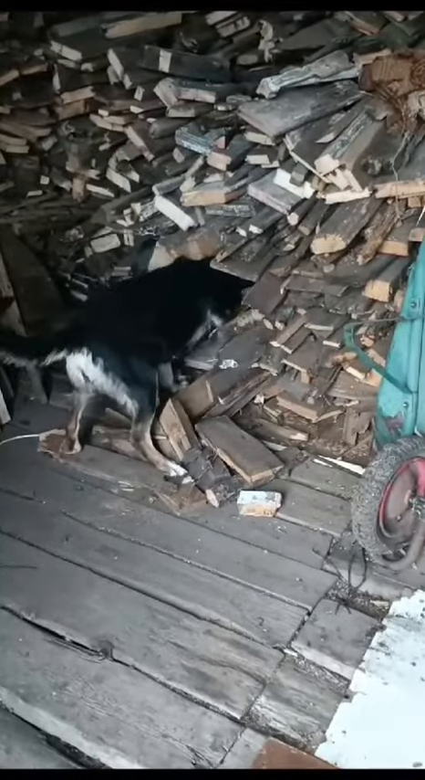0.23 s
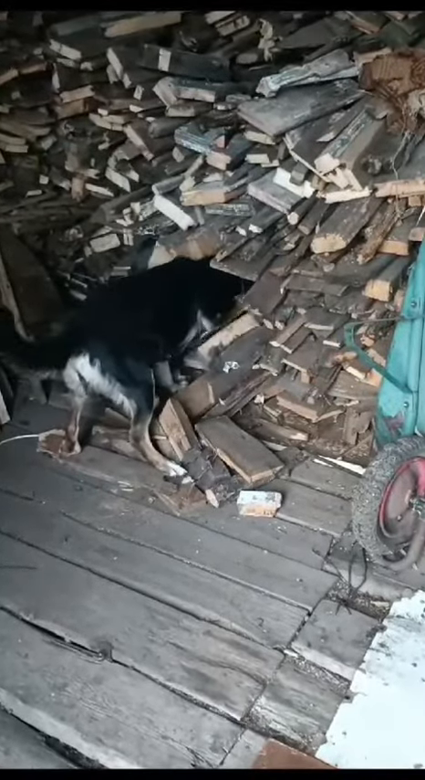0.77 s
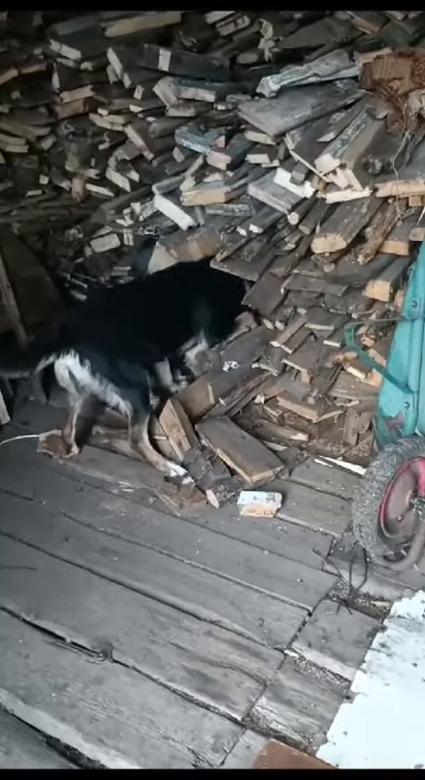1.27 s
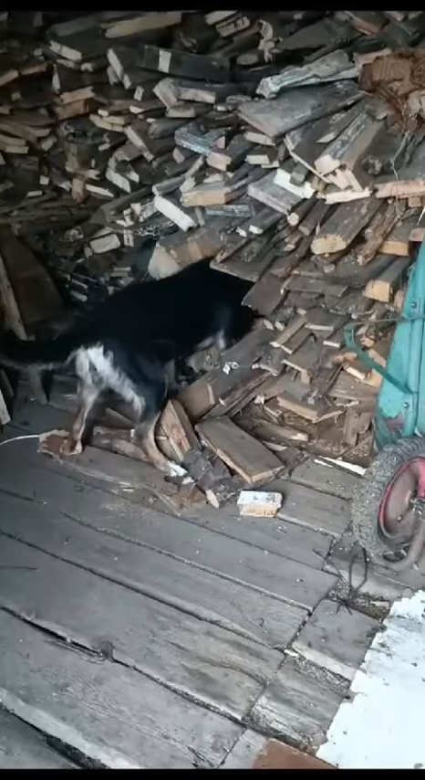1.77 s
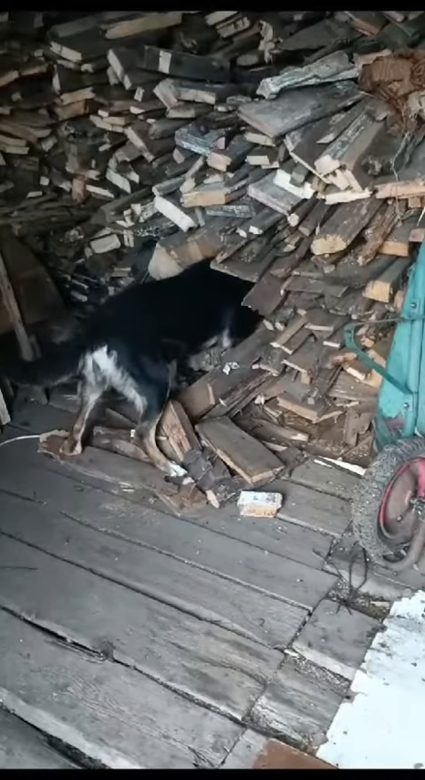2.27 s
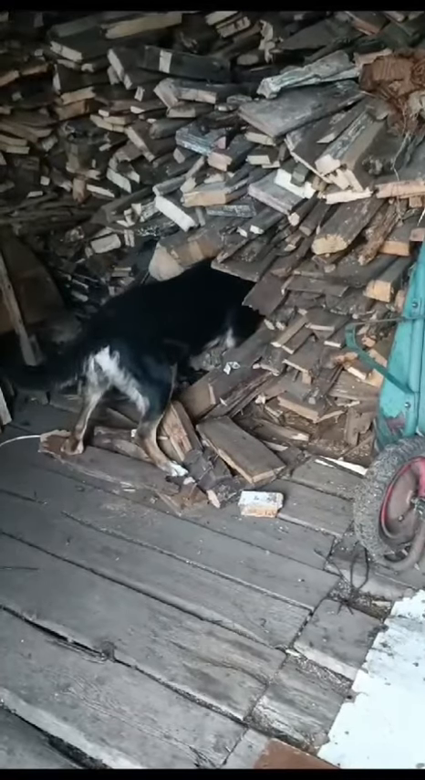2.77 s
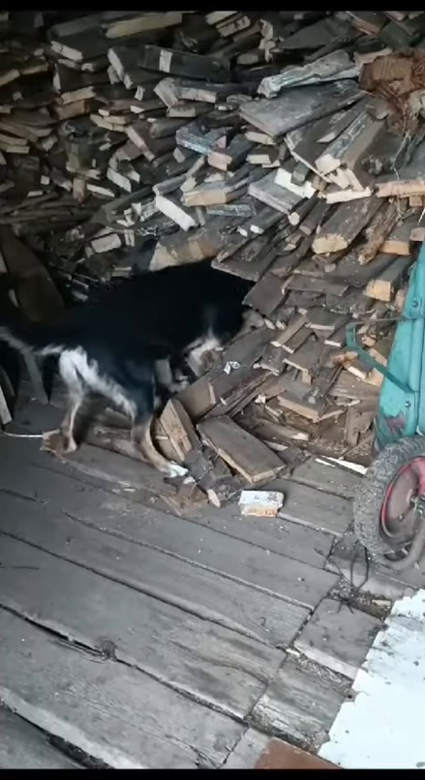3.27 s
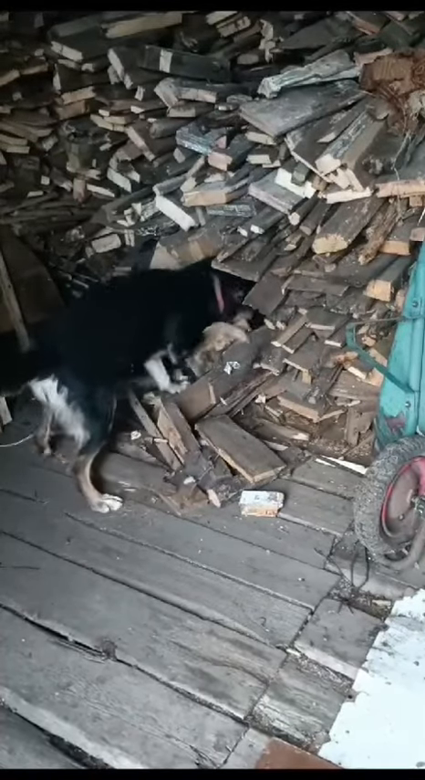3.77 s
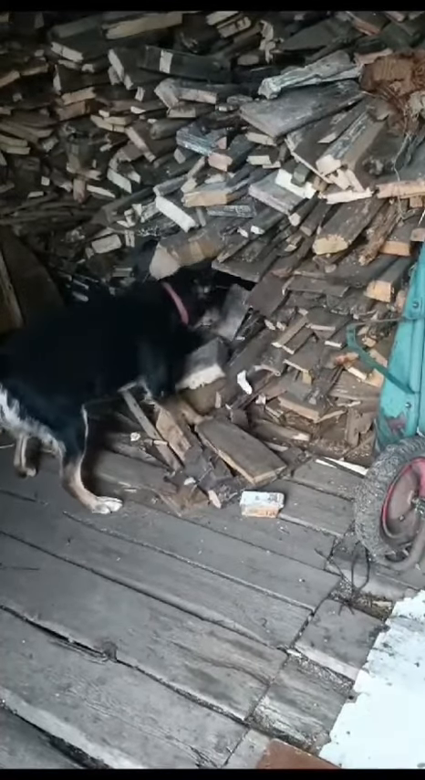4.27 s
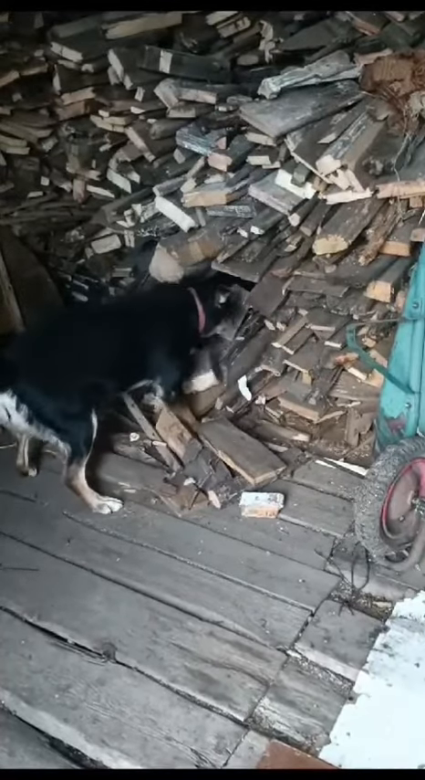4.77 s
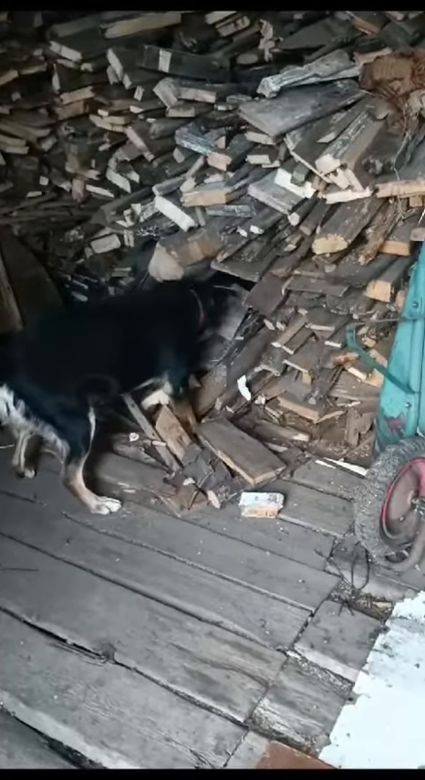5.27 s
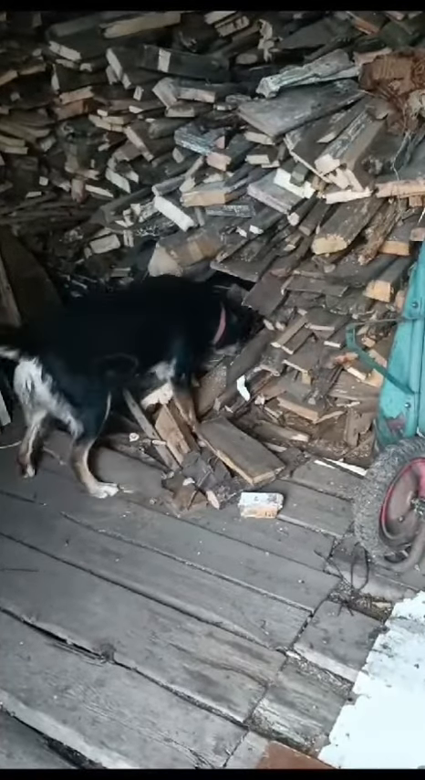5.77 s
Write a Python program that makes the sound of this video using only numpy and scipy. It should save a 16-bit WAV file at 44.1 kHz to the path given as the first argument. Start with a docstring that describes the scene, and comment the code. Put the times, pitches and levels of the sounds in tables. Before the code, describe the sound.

Dry wooden knocks, sharp claw ticks and short scrapes come in uneven bursts as a dog burrows into stacked firewood, heaviest near the end.

```python
"""Dog digging in a woodpile

A dog digs into a pile of split firewood in a plank shed, a few steps from a phone.
Claws and bark edges tick as short noise cracks; logs knock on logs and the floor boards thud as
dying sines. Wood drags on wood as grainy noise in bursts, and soft creaks are swelling sines.
The shed answers with sparse decaying echoes over a faint outdoor hush of patchy noise."""
import sys
import numpy as np
from scipy import signal
from scipy.fft import rfft, irfft
from scipy.io import wavfile
from scipy.ndimage import uniform_filter1d

SR = 44100
rng = np.random.default_rng(int(sys.argv[2]) if len(sys.argv) > 2 else 0)


def materialize(psi):
    """Save the field psi as 16-bit PCM at rate SR to the path in sys.argv[1].

    A 1-D psi becomes a single channel; in a 2-D psi each row is a channel.
    """
    bounded = np.clip(np.atleast_2d(psi).T, -1, 1)
    quanta = np.round(bounded * 32767).astype(np.int16)
    wavfile.write(sys.argv[1], SR, quanta)


N = 265482


def gain_of(db):
    """Amplitude factor for a level in dB."""
    return 10 ** (np.asarray(db) / 20)


def evened(x):
    """Scale a sound to an RMS of one."""
    return x / np.sqrt(np.mean(x ** 2) + 1e-20)


def read(points, hz):
    """Read a curve between its points on a logarithmic frequency axis."""
    f, value = np.transpose(points)
    return np.interp(np.log(hz + 1), np.log(f + 1), value)


def add(mix, start_s, sound):
    """Lay a sound into the mix, cutting off what runs past the end."""
    part = mix[:, max(round(start_s * SR), 0):][:, :sound.shape[1]]
    part += sound[:, :part.shape[1]]


def panned(db):
    """Left and right gains that differ by the given dB."""
    return gain_of(np.array([db, -db]) / 2)


# How alike the sound is at the two microphone ports. Each row: frequency in Hz, likeness from -1 to 1.
LIKENESS = [(60, 0.86), (180, 0.96), (550, 0.56), (1650, -0.16), (5000, 0.25), (15000, -0.34)]


def alike(pair, likeness):
    """Blend the left spectrum into the right one by the given likeness, keeping its power."""
    left, right = pair
    return np.array([left, likeness * left + np.sqrt(1 - likeness ** 2) * right])


def coloured(pair, spectrum):
    """Two unrelated noises become a left-right pair, alike in the bass, with the given spectrum."""
    size = pair.shape[1]
    hz = np.fft.rfftfreq(size, 1 / SR)
    likeness = np.clip(read(LIKENESS, hz), -1, 1)
    return evened(irfft(gain_of(read(spectrum, hz)) * alike(rfft(pair), likeness), size))


DULL_HZ, DULL_DB_PER_OCTAVE = 2670, -13  # wood hardly rings above this


def rung(modes, hz, t60, rise_s, spread):
    """Dying sines of one piece of wood; no two pieces share quite the same ratios."""
    t = np.arange(round(.3 * SR)) / SR
    detune = 1 + spread * rng.uniform(-1.13, 1, len(modes)) * [m[0] != 1 for m in modes]
    ring = np.zeros(len(t))
    for (ratio, db, t60_factor), shift in zip(modes, detune):
        dulling_db = DULL_DB_PER_OCTAVE * max(np.log2(hz * ratio / DULL_HZ), 0)
        envelope = gain_of(db + dulling_db - 60 * t / (t60 * t60_factor))
        ring += envelope * np.sin(2 * np.pi * hz * ratio * shift * t)
    ring = ring * (1 - np.exp(-t / rise_s))
    return ring / abs(ring).max()


# Claws and bark edges catching in the pile, a few steps off. Each row: start in seconds, level in dB
# before the layer gain, dull body in dB and top in dB (both relative to the bright part), centre in Hz.
TICKS = [(0.0214, -15.5, 6, -32, 4240), (0.051, -23.5, -17, -20, 6300), (0.1036, -15, -11, -20, 6300),
         (0.2311, -33.5, -3, -11, 6780), (0.498, -36.5, -5.5, -16, 6200), (0.5515, -35.5, -21, -8, 5700),
         (0.5921, -20, -14, -17.5, 6500), (0.6056, -23.5, -16, -17, 6440), (0.6535, -30.5, -8, -12, 5760),
         (0.7527, -37, -3.5, -19, 6500), (0.7729, -25, -6.5, -17, 5970), (0.8126, -24.5, -10, -10, 4550),
         (0.984, -35, -10, -28, 4100), (1.2101, -39.5, -4.5, -11, 4940), (1.2415, -26.5, -11, -15, 5630),
         (1.294, -37, -12, -22, 6330), (1.3985, -38, -17, -8, 5460), (1.6597, -28.5, -14.5, -7, 4200),
         (1.7418, -19.5, -14, -18.5, 6570), (2.3773, -44.5, -9, -28, 6500), (2.453, -51, -1, -16, 6170),
         (2.5247, -50, -11, -9, 5500), (3.1457, -33, -10, -13, 6500), (3.1893, -33, -7.5, -15, 6330),
         (3.3484, -29.5, 0, -17, 6170), (3.5279, -24.5, -5, -13, 6960), (3.5793, -19, -7, -12, 5070),
         (3.591, -16.5, 1.5, -6.5, 6760), (3.6534, -13, -37, -12, 6460), (3.705, -22.5, -5.5, -10, 4850),
         (3.718, -28, -10, -18, 5000), (3.7755, -31.5, -6, -9, 6800), (3.8636, -33, -17, -9, 6300),
         (3.892, -30, 1, -11, 6150), (4.1083, -20, -15, -17, 6140), (4.1218, -28, 0, 0, 6450),
         (4.252, -16.5, -8, -25, 5600), (4.261, -22, 1, -27, 6100), (4.3263, -19, -27, -29, 6700),
         (4.4098, -29.5, -17, -13, 5000), (4.4306, -22.5, -1.5, -16, 6330), (4.5067, -29, -23, -7, 6800),
         (4.574, -32.5, -31, -13, 6200), (4.662, -35, -17, -13, 6120), (4.6932, -24, -12, -7.5, 6700),
         (4.7538, -26.5, -22, -7, 4760), (4.7733, -18, -13, -7, 5960), (4.8626, -27.5, -9, -22, 6400),
         (4.9014, -30.5, 8.5, -24, 6600), (4.959, -23.5, 16.5, -33, 4800), (5.0338, -35, 6, -35, 5900),
         (5.3823, -48, -25, -16, 6580), (5.4945, -16, -3, -18, 4800), (5.591, -32.5, -1.5, -11, 4900),
         (5.623, -32, -15, -26, 6100), (5.6519, -18.5, -36, -16, 4140), (5.655, -8.5, -35, -13, 7000),
         (5.7965, -28.5, -7, -18, 6500), (5.9208, -25.5, -4, -16, 4860)]
# Colour of scraping wood. Each row: frequency in Hz, relative density in dB per Hz.
RASP = [(1500, -13.5), (2600, -10), (3850, -8), (4460, -3.5), (5530, -8.5), (6350, -1.5), (7230, -5.5),
        (7930, -27), (9320, -16), (14600, -16.5), (15500, -24.5), (16400, -53)]
# Colour of the logs' dull body. Each row: frequency in Hz, relative density in dB per Hz.
BODY = [(250, -50), (420, -10.5), (471, -21.5), (574, 0.5), (634, -8), (766, -1.5), (1000, -5.5),
        (1570, -3), (1700, -0.5), (2600, -4), (3300, -8), (6600, -120)]
SPLIT_HZ = 7900  # border between a tick's bright part and its top
TICK_T60_S = 0.015


def ticks():
    """A few milliseconds of crack, lifted around its own centre; top and dull parts in their own share."""
    size = 2048
    rasp, dull = (coloured(rng.standard_normal((2, N + size)), s) for s in (RASP, BODY))
    t, hz, out = np.arange(size) / SR, np.fft.rfftfreq(size, 1 / SR), np.zeros((2, N))
    envelope = gain_of(-60 * t / TICK_T60_S) * (1 - np.exp(-t / 0.00055))
    for start_s, db, body_db, top_db, centre_hz in TICKS:
        first = round(start_s * SR)
        span = slice(first, first + size)
        spectrum = rfft(rasp[:, span])
        lift_db = 5 * np.exp(-(np.log((hz + 1) / centre_hz) / 0.14) ** 2)
        bright = evened(irfft(spectrum * (hz <= SPLIT_HZ) * gain_of(lift_db)))
        top = evened(irfft(spectrum * (hz > SPLIT_HZ)))
        crack = bright + gain_of(top_db) * top + gain_of(body_db) * dull[:, span]
        crack = crack * envelope
        # a strong body makes the whole tick louder
        add(out, start_s, gain_of(db) * crack * np.hypot(1, gain_of(body_db)) / abs(crack).max())
    return out


# Log on log in the pile. Each row: start in seconds, level of the big log in dB before the layer gain,
# pitch of the big log in Hz, pitch of the small log in Hz, small log relative to the big one in dB,
# base t60 in seconds.
KNOCKS = [(0.0222, -19.5, 565, 1593, 6, 0.03), (0.07, -31, 790, 1780, 2.5, .057),
          (0.241, -33.5, 655, 2040, -10, 0.08), (0.299, -34.5, 693, 1520, -7, 0.027),
          (0.392, -44, 800, 1560, 4.5, 0.058), (0.497, -46.5, 810, 1460, 4.5, 0.054),
          (0.59, -54, 895, 2540, 12, .05), (0.719, -49, 1045, 2090, 9, .064),
          (0.774, -37, 716, 1500, 7, .045), (1.089, -36.5, 710, 1850, -11, 0.03),
          (1.204, -48, 513, 1580, 0, 0.13), (1.381, -37.5, 510, 1870, -21, 0.028),
          (1.741, -54.5, 710, 2080, 16.5, 0.074), (2.164, -65, 580, 1950, 8, .05),
          (2.366, -62, 836, 2180, 15, 0.018), (2.449, -59, 610, 1760, 13, 0.02),
          (3.188, -39.5, 660, 2450, -8, 0.14), (3.332, -25.5, 550, 1420, -32, 0.039),
          (3.477, -52, 698, 1900, 16, .04), (3.495, -51, 680, 1920, 17, 0.049),
          (3.519, -32.5, 1050, 2046, -6, 0.23), (3.589, -33.5, 674, 1636, 9, 0.048),
          (3.609, -18.5, 710, 1450, -7, 0.024), (3.702, -33.5, 715, 2105, -6, 0.15),
          (3.862, -33.5, 527, 1880, -10, 0.035), (3.892, -51, 615, 1710, 9, 0.028),
          (3.996, -36.5, 990, 1200, -3, .056), (4.191, -27, 597, 1550, 3.5, .038),
          (4.26, -27, 1060, 1830, 4, .043), (4.278, -17, 723, 1280, -2.5, 0.028),
          (4.288, -26, 576, 1770, 7, 0.018), (4.299, -23.5, 1120, 1564, 8, 0.042),
          (4.355, -28.5, 780, 1600, -6, 0.049), (4.367, -24.5, 853, 2310, 2.5, 0.038),
          (4.431, -31, 453, 1870, 2, 0.074), (4.524, -50, 660, 1520, 14.5, .065),
          (4.643, -40, 680, 1260, -1, 0.028), (4.661, -26.5, 1005, 1520, 1, 0.022),
          (4.866, -32, 550, 1670, -5, .05), (4.896, -19.5, 530, 2380, -14, 0.059),
          (4.9595, -4, 605, 2150, -13, 0.025), (4.968, -11, 516, 1860, -9, 0.093),
          (5.0335, -11.5, 558, 2125, -10.5, 0.051), (5.044, -14, 600, 1930, -11, 0.015),
          (5.195, -42, 613, 1920, 10, 0.11), (5.498, -14, 542, 1200, -24, 0.023),
          (5.512, -17, 710, 2680, -5.5, 0.018), (5.658, -29.5, 1110, 2226, 13, 0.018),
          (5.776, -30, 685, 1270, -35, 0.096), (5.83, -19.5, 697, 1380, -9, 0.028),
          (5.918, -42, 696, 1950, 6, .05), (5.951, -22.5, 584, 1400, -7.5, 0.028),
          (5.981, -16.5, 1430, 2240, 0.5, 0.035), (5.991, -23, 1150, 2394, 2, .04)]
# Modes of a log. Each row: factor on pitch, level in dB, factor on t60.
LOG = [(.77, -12, 0.99), (1, 2.5, 0.63), (1.29, -11.5, 0.97), (1.74, -6.5, 0.56), (2.4, -9, 0.57)]
KNOCK_PAN_DB = -1  # left-right


def knocks():
    """Each blow rings both logs that meet."""
    out = np.zeros((2, N))
    for start_s, db, big_hz, small_hz, small_db, t60 in KNOCKS:
        big, small = (rung(LOG, hz, t60, rise_s=0.00076, spread=.08) for hz in (big_hz, small_hz))
        both = big + gain_of(small_db) * small
        add(out, start_s, gain_of(db) * np.outer(panned(KNOCK_PAN_DB), both))
    return out


# Weight landing on the shed's floor boards. Each row: start in seconds, peak in dB before the layer
# gain, pitch in Hz.
THUDS = [(0.008, -28.5, 181.5), (0.024, -23.5, 274), (0.215, -34, 258), (0.514, -42.5, 151),
         (0.656, -34.5, 146), (0.738, -38.5, 170), (1.078, -29.5, 158), (1.209, -33, 131),
         (1.315, -36.5, 346), (1.378, -40, 134), (3.121, -40.5, 244), (3.195, -39, 243),
         (3.272, -34.5, 176), (3.336, -21, 149.5), (3.601, -18.5, 270), (3.657, -24.5, 250),
         (3.862, -45, 446), (3.929, -36.5, 141.4), (4.123, -31, 147), (4.181, -22, 280),
         (4.239, -28.5, 138), (4.282, -20.5, 285), (4.355, -23, 259), (4.424, -31, 171),
         (4.542, -32.5, 323.6), (4.687, -33.5, 173), (4.766, -29.5, 255.6), (4.893, -19, 159),
         (4.962, -14.5, 176), (5.036, -21, 281), (5.491, -20, 312.3), (5.665, -24, 136),
         (5.684, -19.5, 148), (5.775, -16.5, 254), (5.831, -21, 290), (5.954, -16.5, 163)]
# Modes of the floor boards. Each row: factor on pitch, level in dB, factor on t60.
BOARDS = [(.72, -12, 1), (1, 2, 0.75), (1.55, -5.5, 0.8), (2.1, -6.5, 0.67)]


def thuds():
    """Soft, heavy contacts: the boards swing up slowly."""
    out = np.zeros((2, N))
    for start_s, db, hz in THUDS:
        ring = rung(BOARDS, hz, t60=0.065, rise_s=0.0091, spread=0.098)
        add(out, start_s, gain_of(db) * np.outer([1, 1], ring))
    return out


# Colour of the boards under the dragging wood. Each row: frequency in Hz, relative density in dB per Hz.
RUMBLE = [(15, -55), (25, -57), (48, 0.5), (86, -10.5), (134, 0), (183, -1), (215, -9), (259, 0), (296, -6),
          (480, -21.5), (620, -50), (1060, -120)]


def drag(grain_s=0.0031, smooth=0.44, ringing=0.57):
    """Each slip is a short puff of rasp; the logs chatter and the boards rumble under it."""
    puffs = signal.lfilter([1], [1, -np.exp(-1 / (grain_s * SR))], slips(per_s=980, uneven_db=3.5))
    grains = smooth + evened(puffs)
    rasp, body, rumble = (coloured(grains * rng.standard_normal((2, N)), c) for c in (RASP, BODY, RUMBLE))
    body = evened((1 - ringing) * body + ringing * chatter())
    return sum(level * layer for level, layer in zip(strokes(), (rasp, body, rumble)))


# Strokes of wood dragging on wood. Each row: start in seconds, hold in seconds, rasp in dB, body in dB,
# rumble in dB.
STROKES = [(0.0, 0.036, -34, -39, -40.5), (0.071, 0.14, -48, -50, -53.5), (0.314, 0.019, -54, -56, -53.5),
           (0.387, .04, -61.5, -61, -67), (0.523, 0.032, -62, -62.5, -66), (0.66, 0.058, -52.5, -48, -55),
           (0.758, 0.031, -45, -48, -49.5), (0.854, 0.05, -55.5, -61.5, -75),
           (0.986, 0.11, -58, -61.5, -61), (1.246, 0.056, -47, -52.5, -58.5),
           (1.322, 0.068, -59.5, -57, -49.5), (1.58, 0.27, -65.5, -72, -74), (2.458, 0.06, -65.5, -75, -67),
           (3.046, .04, -63, -72, -75), (3.108, 0.056, -57.5, -62, -60.5), (3.196, 0.045, -52, -53.5, -61),
           (3.324, 0.027, -42, -46, -48.5), (3.405, 0.056, -53, -55.5, -58.5), (3.485, 0.03, -44, -55, -73),
           (3.578, 0.094, -43.5, -43.5, -45), (3.704, 0.016, -38.5, -41, -44.5),
           (3.784, 0.018, -46.5, -63, -72), (3.896, 0.044, -53.5, -48, -54.5),
           (4.007, 0.015, -51, -52, -63), (4.144, 0.12, -34.5, -40.5, -43),
           (4.225, 0.084, -33.5, -34.5, -41), (4.351, 0.038, -60, -40, -43),
           (4.434, 0.0096, -39.5, -44, -52), (4.496, .05, -52.5, -58, -61),
           (4.672, 0.15, -49.5, -50.5, -47.5), (4.879, 0.044, -37, -45, -44.5),
           (4.952, 0.09, -39, -36.5, -40), (5.089, 0.039, -48.5, -64, -55),
           (5.202, 0.0086, -44.5, -47.5, -51), (5.29, 0.067, -69, -67, -62.5),
           (5.396, 0.076, -60.5, -65.5, -63), (5.636, 0.077, -44, -47, -51), (5.821, 0.0083, -36, -41, -45),
           (5.939, .02, -45, -47.5, -37.5)]
# rasp, body, rumble: heavier wood moves more slowly
RISE_DB_PER_S, FALL_DB_PER_S = (440, 306, 203), (281, 210, 136)
SETTLING_DB = (-74, -75, -71)  # the pile never lies quite still: rasp, body, rumble
TRICKLE_DB, TRICKLE_FALL_DB_PER_S = -22.5, 68.5  # bark crumbs trickle on, relative to the stroke


def strokes():
    """Each stroke swells, holds and dies away; rasp, body and rumble levels for the whole scene."""
    t = np.arange(0, N + 64, 64) / SR
    power = gain_of(SETTLING_DB)[:, None] ** 2
    for start_s, hold_s, *db in STROKES:
        early = np.maximum(start_s - t, 0)
        late = np.maximum(t - start_s - hold_s, 0)
        swell = gain_of(np.c_[db] - np.outer(RISE_DB_PER_S, early))
        trickle = gain_of(TRICKLE_DB - TRICKLE_FALL_DB_PER_S * late)
        fall = gain_of(-np.outer(FALL_DB_PER_S, late)) + trickle
        power = power + (swell * fall) ** 2
    return [np.interp(np.arange(N) / SR, t, np.sqrt(p)) for p in power]


def slips(per_s, uneven_db):
    """Fibres let go at random moments; a few let go hard."""
    force = gain_of(uneven_db * np.minimum(rng.exponential(1, N), 4))
    return force * (rng.random(N) < per_s / SR)


def chatter(count=16):
    """Small slips ring many different logs, each heard from its own side."""
    out = np.zeros((2, N))
    for hz in np.geomspace(480, 2300, count):
        pitch_hz = hz * rng.uniform(0.91, 1.05)
        ring = rung(LOG, pitch_hz, t60=0.095, rise_s=0.00096, spread=0.1116)[:4000]
        side = rng.uniform(0, np.pi)  # small logs reach the two ports out of step
        phase = side * min(hz / 1500, 1)
        train = signal.oaconvolve(slips(per_s=30, uneven_db=4.5), gain_of(read(BODY, hz)) * ring)[:N]
        out += np.outer([1, np.cos(phase)], train)
        out[1] += np.sin(phase) * np.roll(train, round(SR / hz / 4))  # a quarter period late
    return evened(out)


# Soft creaks as the pile settles. Each row: start in seconds, length in seconds, peak in dB, pitch in Hz.
CREAKS = [(1.859, 0.038, -64, 590), (1.914, 0.027, -63.5, 600), (2.186, 0.038, -60, 603),
          (2.255, 0.048, -56, 590), (2.669, 0.041, -60, 448)]


def creaks():
    """A single mode swells and fades without a blow."""
    out = np.zeros((2, N))
    for start_s, length_s, db, hz in CREAKS:
        t = np.arange(0, length_s, 1 / SR)
        creak = np.hanning(len(t)) * np.sin(2 * np.pi * hz * t)
        add(out, start_s, gain_of(db) * np.outer([1, 1], creak))
    return out


# Decay of the plank shed. Each row: frequency in Hz, t60 in seconds.
SHED = [(100, 0.19), (400, 0.21), (1500, 0.14), (5000, 0.12), (12000, 0.12)]


def shed(x):
    """Sparse echoes of random sign from 5 ms on, each band dying at its own speed."""
    size = SR // 2
    taps = np.zeros((2, size))
    at = np.arange(220, size - 20, 20)
    at = at + rng.integers(0, 20, (2, len(at)))
    np.put_along_axis(taps, at, rng.choice([-1., 1.], at.shape), 1)
    likeness = np.clip(read(LIKENESS, np.fft.rfftfreq(size, 1 / SR)), 0, 1)
    taps = irfft(alike(rfft(taps), likeness), size)
    hz, t, z = signal.stft(taps, SR, nperseg=128)
    tail = signal.istft(z * gain_of(-60 * t / read(SHED, hz)[:, None]), SR, nperseg=128)[1]
    # even out the colour of the echoes, keep the decay
    spectrum = rfft(tail)
    power = uniform_filter1d(abs(spectrum) ** 2, size=60, axis=1).mean(0)
    tail = irfft(spectrum / np.sqrt(power))[:, :SR // 3]
    return signal.fftconvolve(x, tail / np.linalg.norm(tail[0]), axes=1)[:, :N]


# Colour of the distant outdoors. Each row: frequency in Hz, relative density in dB per Hz.
HUSH = [(15, -53), (25, -11.5), (167, -2), (219, -10.5), (280, -5.5), (494, -12.5), (597, -6.5), (648, -13),
        (1460, -21.5), (3880, -25), (6500, -28), (7860, -39.5), (9770, -28.5), (15100, -26.5),
        (16400, -38.5)]
HUSH_DB = -66  # RMS before the patches


def hush():
    """Distant outdoor noise with slow patches."""
    noise = coloured(rng.standard_normal((2, N + 2048)), HUSH)
    _, _, z = signal.stft(noise, SR, nperseg=1024)
    patches = rng.standard_normal(z.shape[1:])
    for axis in (0, 1):  # smooth over frequency, then over time
        patches = uniform_filter1d(patches, size=8, axis=axis)
    patchy = z * gain_of(0.69 * evened(patches))
    return gain_of(HUSH_DB) * signal.istft(patchy, SR, nperseg=1024)[1][:, :N]


# How strongly each sound stirs the shed: level in dB by layer, relative to the direct sound.
ECHO_DB = dict(ticks=-4, knocks=-2, thuds=-2, drag=-22.5)


def scene():
    """The digging heard directly, its echoes in the shed, and the hush outdoors."""
    parts = dict(
        ticks=gain_of(2.5) * ticks(),
        knocks=gain_of(-4.0) * knocks() + creaks(),
        thuds=gain_of(-4.5) * thuds(),
        drag=drag())
    to_shed = sum(gain_of(ECHO_DB[name]) * part for name, part in parts.items())
    return sum(parts.values()) + shed(to_shed) + hush()


# Colour of the phone's microphone, both ports alike. Each row: frequency in Hz, gain in dB.
MIC = [(30, -20), (70, 2.5), (2600, 1.5), (2900, -2.5), (3300, 0)]
# Difference between the two ports. Each row: frequency in Hz, left-right difference in dB.
PORTS = [(60, 0.5), (99, -1.5), (160, 0.5), (270, -1), (450, -1), (740, 2), (1220, -1.5), (2010, -5.5),
         (3330, 3.5), (5500, -13.5), (9080, 4), (15000, -8.5)]
OVERLOAD = .75  # level at which the microphone's amplifier flattens
EDGE_HZ = 16300  # upper band limit


def record(dry):
    """The microphone's colour, the treble unlike in its two ports; soft overload; then the band limit."""
    hz = np.fft.rfftfreq(2048, 1 / SR)
    response = irfft(gain_of(read(MIC, hz)) * panned(read(PORTS, hz)))
    ports = np.roll(response, 1024, axis=1) * np.hanning(2048)
    heard = signal.oaconvolve(dry, ports, axes=1)[:, 1024:][:, :N]  # take out the filter's delay
    heard = OVERLOAD * np.tanh(heard / OVERLOAD)
    band_limit = signal.firwin(511, EDGE_HZ, window=("kaiser", 9), fs=SR)
    return signal.oaconvolve(heard, band_limit[None], "same")


dry = scene()
out = record(dry)
materialize(out)
```